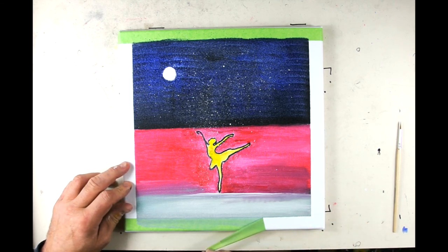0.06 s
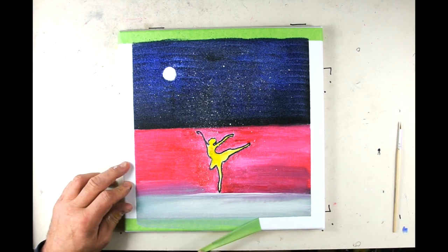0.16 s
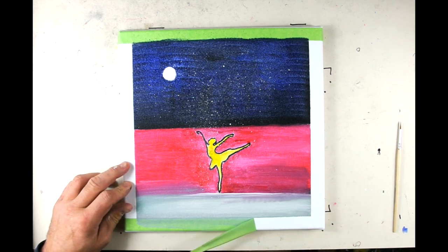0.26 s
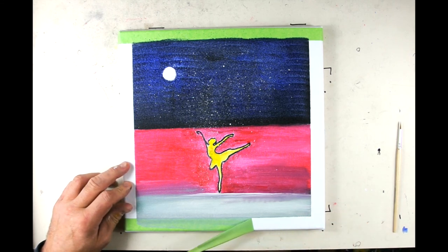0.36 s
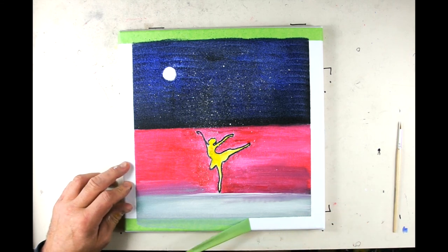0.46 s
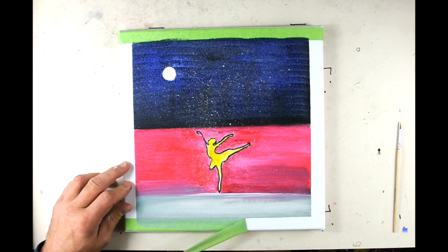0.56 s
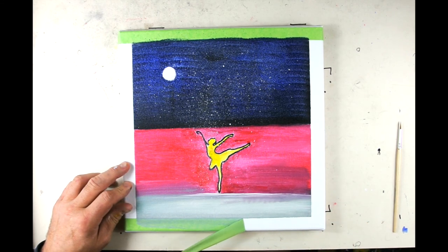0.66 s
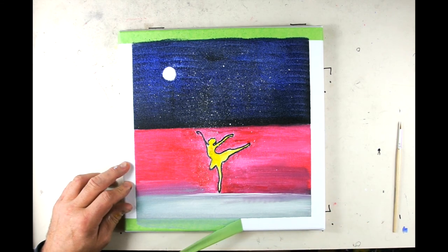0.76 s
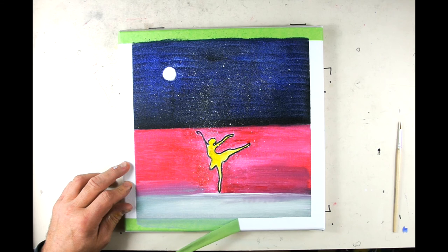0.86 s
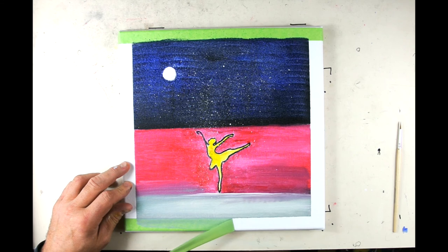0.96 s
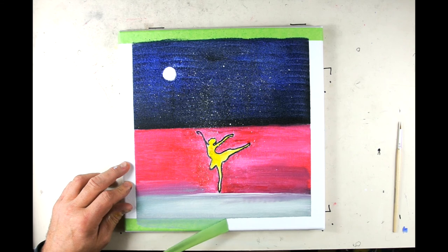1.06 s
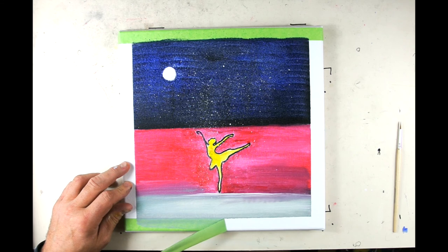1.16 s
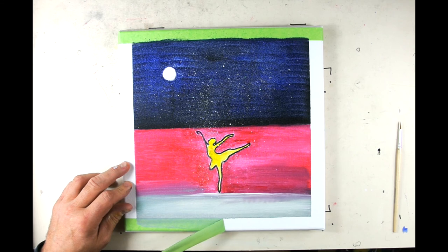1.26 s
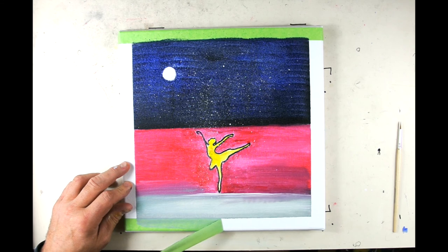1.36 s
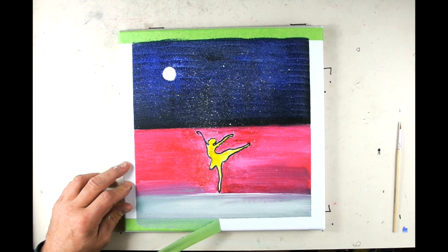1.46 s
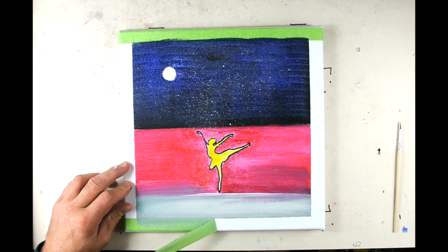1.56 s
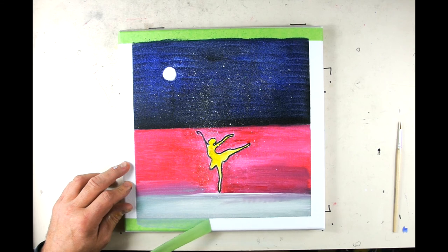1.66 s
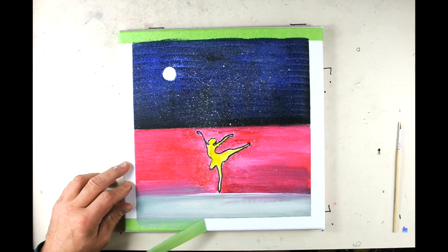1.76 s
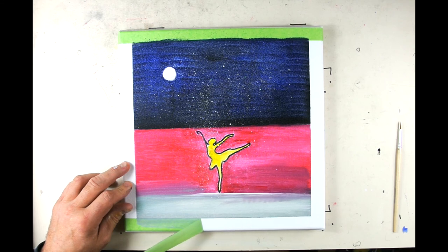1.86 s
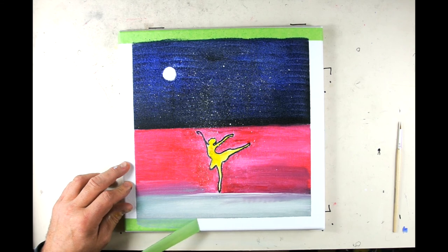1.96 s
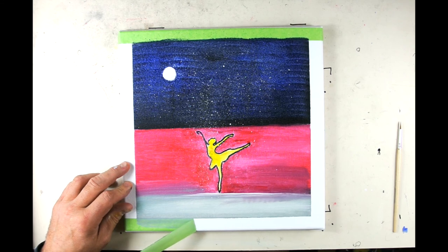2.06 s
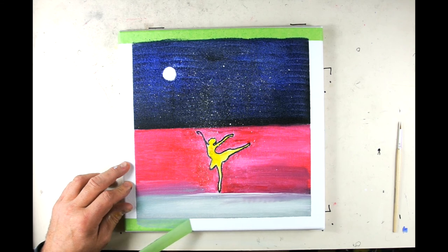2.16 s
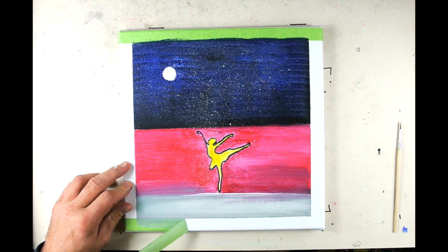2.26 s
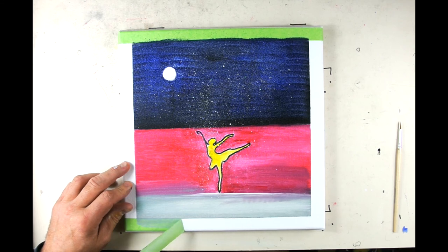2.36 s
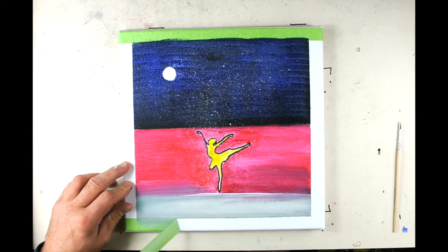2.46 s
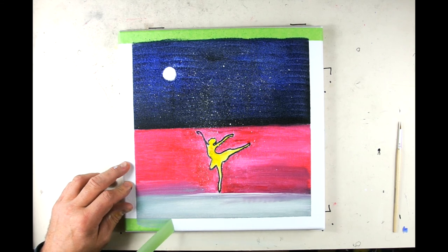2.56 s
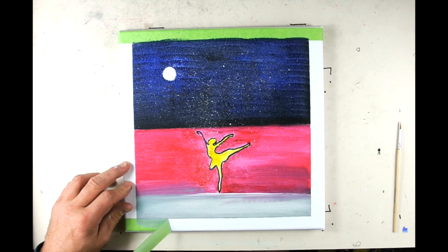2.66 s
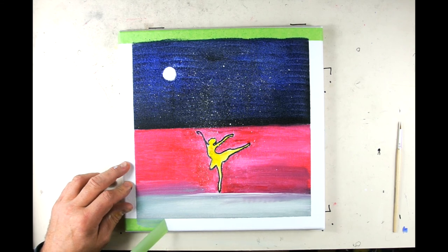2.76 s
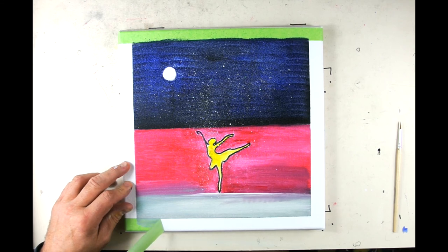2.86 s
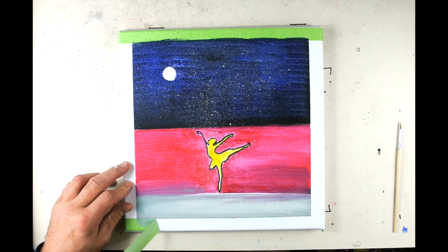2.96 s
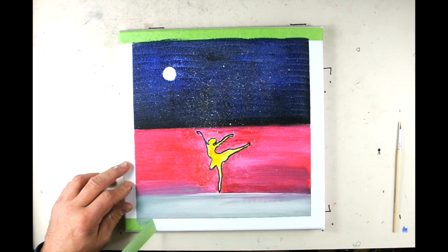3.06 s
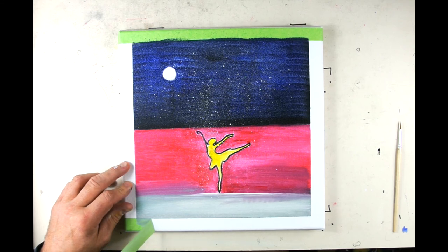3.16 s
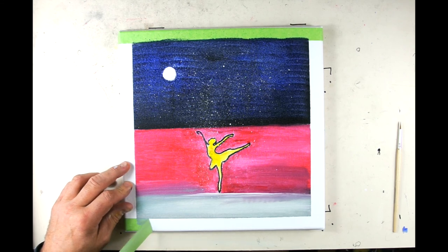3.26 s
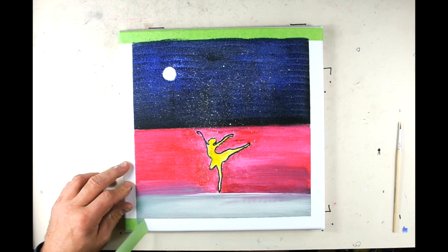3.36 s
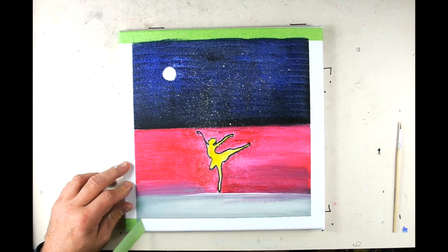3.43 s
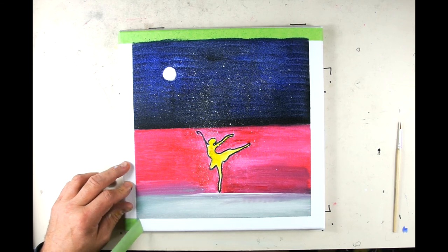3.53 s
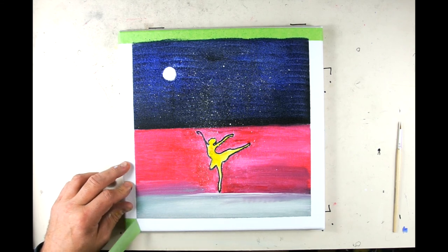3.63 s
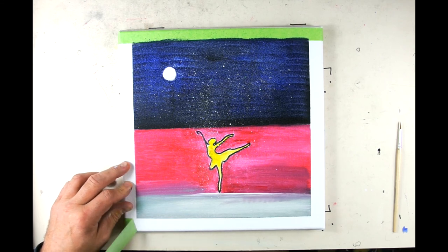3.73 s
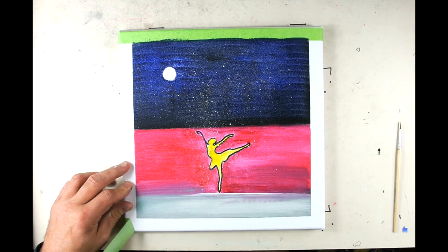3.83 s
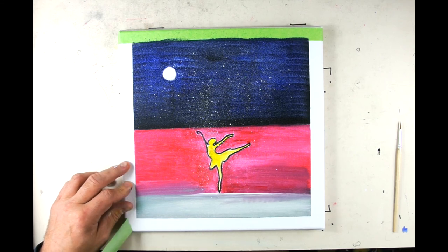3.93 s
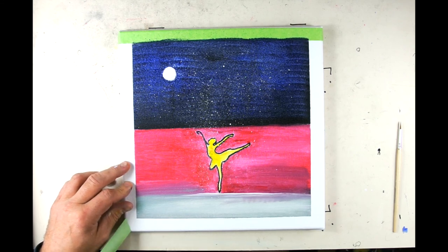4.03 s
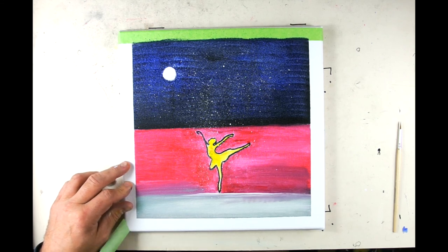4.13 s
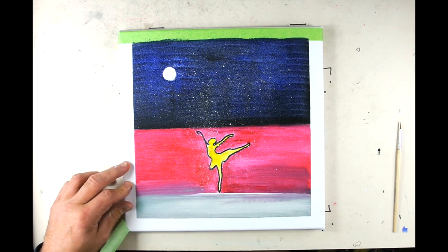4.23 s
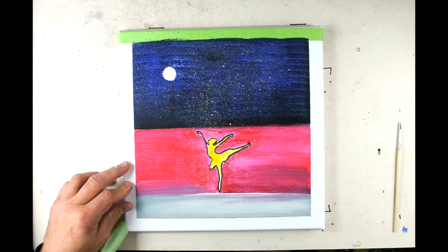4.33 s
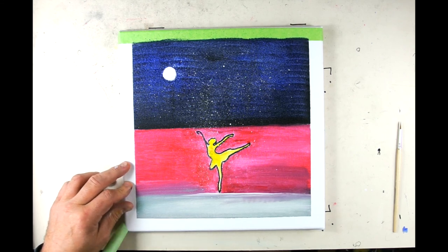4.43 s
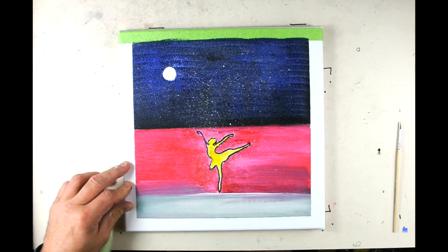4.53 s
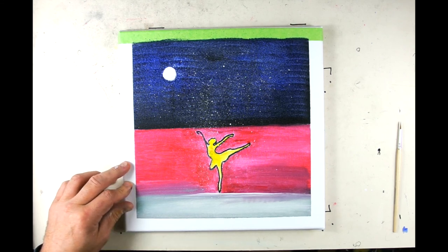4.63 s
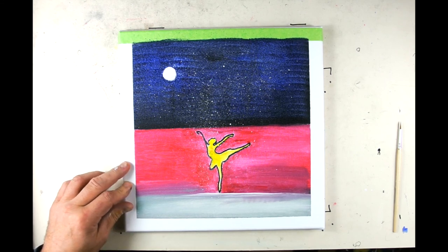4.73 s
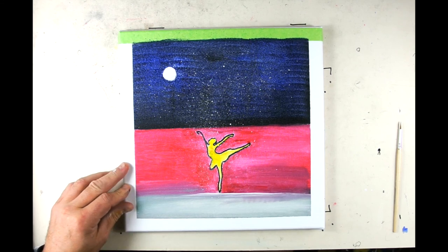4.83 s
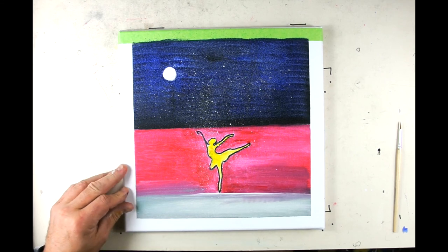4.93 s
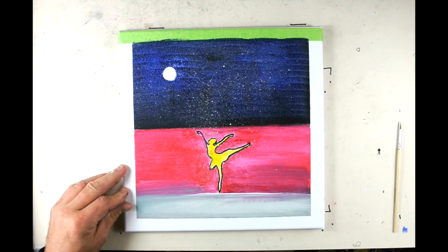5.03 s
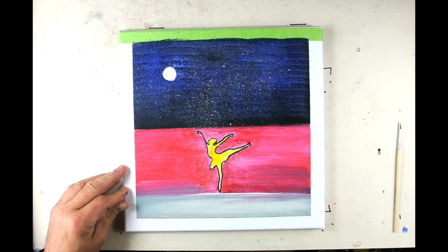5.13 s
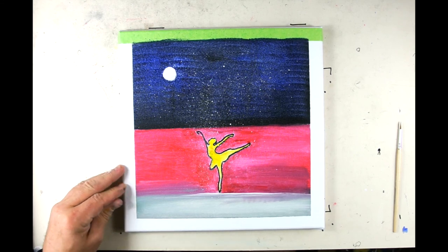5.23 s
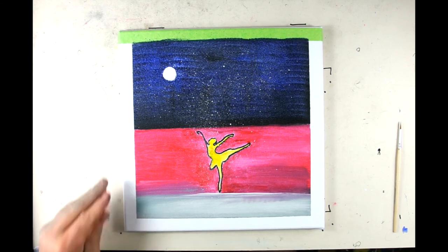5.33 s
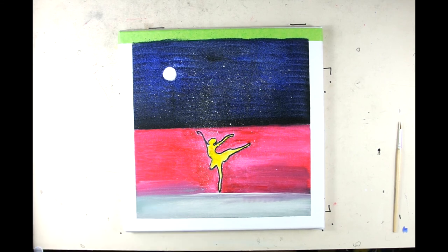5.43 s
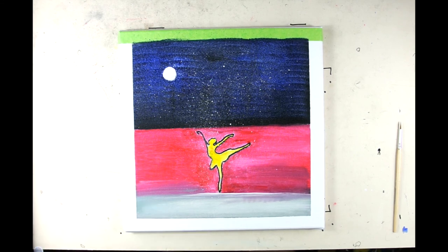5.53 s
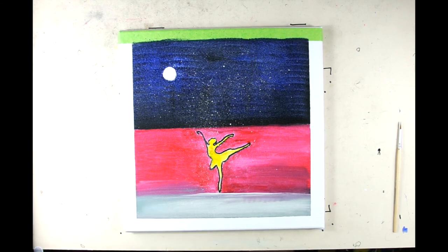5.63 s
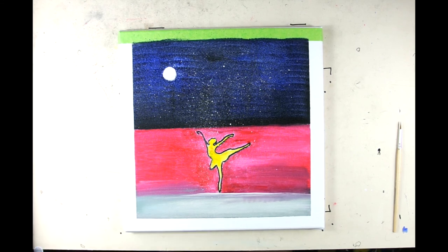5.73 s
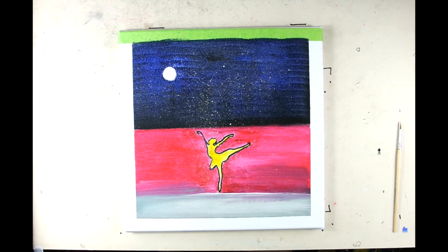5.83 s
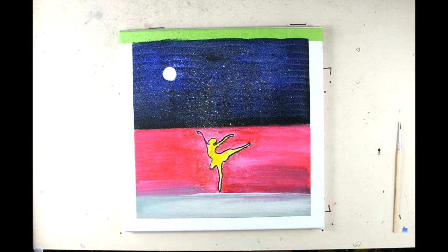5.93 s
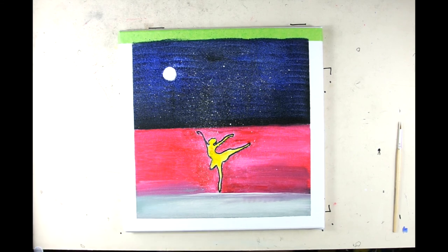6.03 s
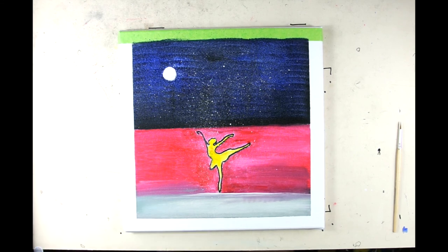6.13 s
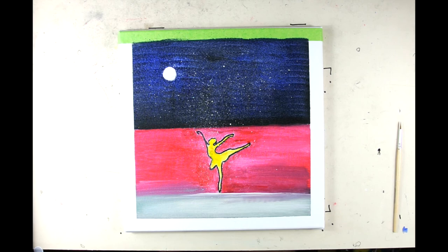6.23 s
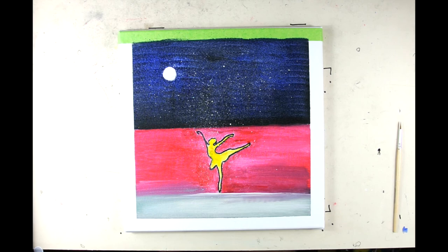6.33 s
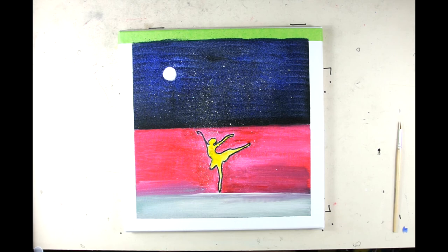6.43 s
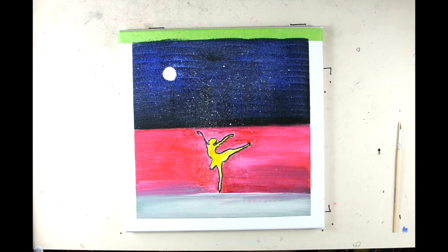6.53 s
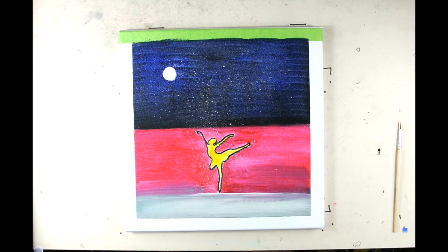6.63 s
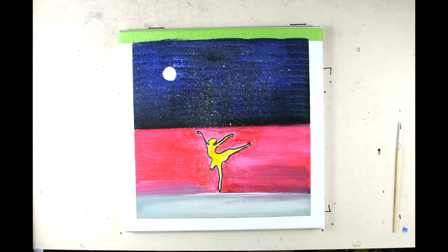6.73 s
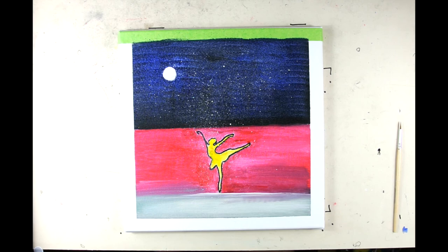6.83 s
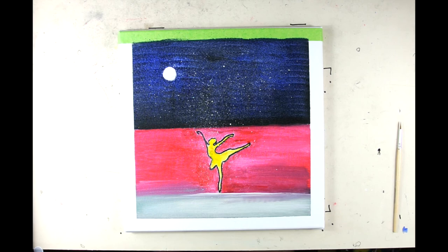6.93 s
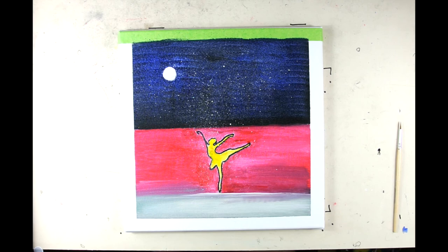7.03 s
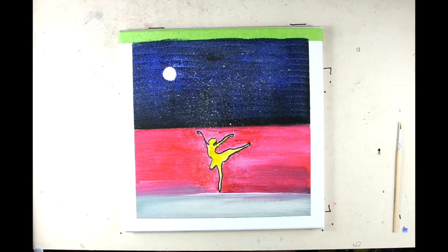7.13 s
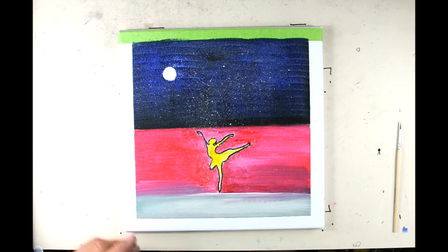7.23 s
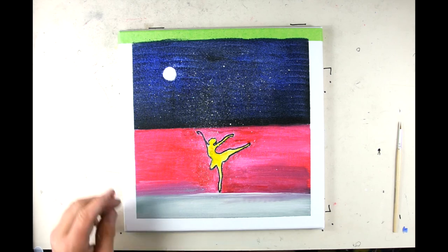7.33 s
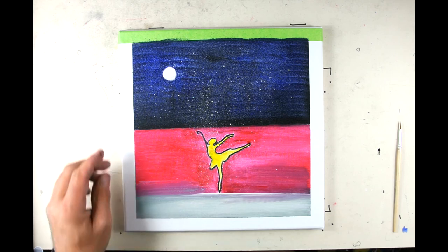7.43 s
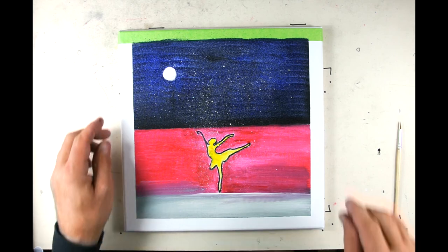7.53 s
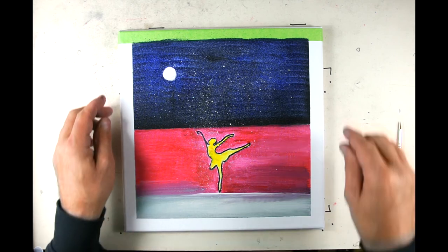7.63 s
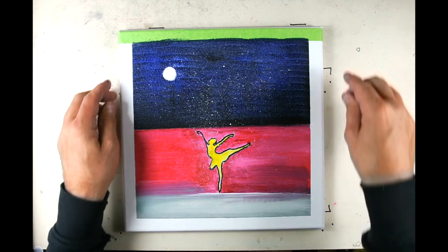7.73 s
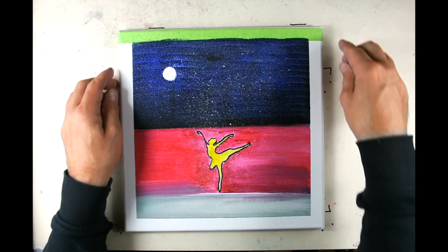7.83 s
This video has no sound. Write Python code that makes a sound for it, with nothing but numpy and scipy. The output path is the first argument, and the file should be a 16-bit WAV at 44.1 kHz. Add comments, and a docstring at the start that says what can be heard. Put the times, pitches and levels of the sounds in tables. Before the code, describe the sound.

In a quiet room, close to the microphone, masking tape is already being peeled from a stretched canvas. Fine, fizzy glue crackle and sharp papery pops start at once, with a cluster of cracks before 0.25 seconds, then a weaker, slower pull. Stronger rasping tugs swell around 1.0 and 1.6 seconds, and more follow unevenly through 2.5 and 3.7, each shaking the taut cloth and frame into short, hollow, woody resonance. From about 3.9 the canvas body fades, leaving thinner, drier paper crackle. At 4.48 to 4.5 the end rips free in a very quick, loud, whip-like snap with a short room tail. Afterwards the loose strip flutters softly, with muffled low bumps on the table until about 5.5. Crisp ticks and bright rustles come near 5.5, 5.8, 6.27, 6.4 and 6.7, then die away into faint, steady hiss.

```python
"""Tape peeled off a stretched canvas

Masking tape is pulled off the edge of a canvas lying on a table, in a quiet room. Glue threads break in random
grains of noise that follow tugs of the hand; filters let the paper strip, the cloth and the frame sound with them.
Near the corner the canvas fades, and the last bit lets go with a snap of five quick jerks.
The loose strip then ticks and rustles in grains of band-shaped noise, among soft bumps of decaying low sines."""
import sys
import numpy as np
from scipy import signal
from scipy.fft import rfft, irfft, next_fast_len
from scipy.io import wavfile
from scipy.ndimage import uniform_filter1d

SR = 44100
rng = np.random.default_rng(int(sys.argv[2]) if len(sys.argv) > 2 else 0)


def log_audio(samples):
    """Write samples as a 16-bit WAV file to the path given in sys.argv[1]."""
    # one column per channel
    frames = np.atleast_2d(samples).T
    # limit to full scale, then quantise
    limited = np.clip(frames, -1, 1)
    pcm = np.round(limited * 32767).astype(np.int16)
    wavfile.write(sys.argv[1], SR, pcm)


N = 348081
TIME = np.arange(N) / SR
SIZE = 2 * (next_fast_len(N + SR) // 2)  # even transform length with a second to spare for tails
FREQS = np.maximum(np.fft.rfftfreq(SIZE, 1 / SR), 1)

# quick jerks in which the end of the tape tears free: (time [s], level [dB])
SNAP_JERKS = [(4.478, -15), (4.484, -21), (4.4874, -11), (4.4928, -20), (4.4953, -15.5)]
# spectrum of a sudden slip or crack in the paper: (frequency [Hz], relative level [dB])
SLIP_SPECTRUM = [(100, -18), (900, -4.5), (2200, -13), (3600, 4), (6000, -1), (10000, 4), (16000, 4)]
# left-right likeness of the paper strip: (frequency [Hz], likeness [0-1])
STRIP_LIKENESS = [(500, 0.53), (2000, 0.43), (4000, 0.22), (7500, 0.011), (11000, 0.037), (15000, 0.088)]


def from_db(db):
    """Decibels to gain."""
    return np.exp(np.asarray(db) * (np.log(10) / 20))


def rms_one(x):
    """Scale to an rms of 1."""
    return x / np.sqrt(np.mean(np.abs(x) ** 2) + 1e-20)


def in_time(rows):
    """Each column of a curve at every sample."""
    s, *columns = np.transpose(rows)
    return [np.interp(TIME, s, column) for column in columns]


def at_hz(points, hz=FREQS):
    """Read a table on a log-frequency axis."""
    f, value = np.transpose(points)
    return np.interp(np.log(hz), np.log(f), value)


def filtered(x, response):
    """Pass a signal through a frequency response."""
    spectrum = rfft(x.astype(np.float32), SIZE)
    return irfft(spectrum * response.astype(np.complex64))[..., :N]


def colour(points, size=16384):
    """Causal (minimum-phase) response of a spectrum, keeping the power of white noise."""
    hz = np.maximum(np.fft.rfftfreq(size, 1 / SR), 1)
    cepstrum = irfft(np.log(from_db(at_hz(points, hz))))
    # folding the cepstrum forward puts all the energy after the onset
    cepstrum[1:size // 2] *= 2
    cepstrum[size // 2 + 1:] = 0
    impulse = irfft(rms_one(np.exp(rfft(cepstrum))))
    return rfft(impulse.astype(np.float32), SIZE)


def spread(pair, likeness):
    """Mix two unrelated signals, as mid and side, into ears of a given likeness per frequency."""
    alike = np.clip(at_hz(likeness), -.99, .99)
    mid, side = filtered(pair, np.sqrt([(1 + alike) / 2, (1 - alike) / 2]))
    return np.array([mid + side, mid - side])


def drift(rate_hz):
    """Smooth chance with an rms of 1, drawn at every 20th sample."""
    step, run_in = 20, SR // 20
    r = np.exp(-2 * np.pi * rate_hz * step / SR)
    chance = rng.standard_normal(N // step + 2 + run_in)
    slow = signal.lfilter([1], [1, -2 * r, r * r], chance)[run_in:]
    return np.interp(TIME, np.arange(len(slow)) * step / SR, rms_one(slow))


def blows(times, level_db, length_s):
    """Energy of single blows, each worth its level held for length_s."""
    energy = np.zeros(N)
    energy[np.round(times * SR).astype(int)] = from_db(level_db) ** 2 * length_s * SR
    return energy


def breaks(per_s, size_db, clump_db, clump_rate_hz):
    """Tiny contacts break at random, in clumps as they stick and slip; energy per sample, 1 on average."""
    scatter_db = size_db * np.minimum(rng.exponential(1, N), 4)
    sizes = from_db(scatter_db + clump_db * drift(clump_rate_hz))
    energy = (rng.random(N) < per_s / SR) * sizes ** 2
    return energy / (uniform_filter1d(energy, size=2600) + 1e-9)


def crackle(energy, ring_s, spike_share):
    """Each break is a sharp central spike, then a short dying flurry of waves in the sheet; a mid-side pair."""
    r, share = np.exp(-1 / (ring_s * SR)), np.clip(spike_share, 0, 1)
    lingering = signal.lfilter([1 - r], [1, -r], energy + 1e-18)
    pair = np.sqrt((1 - share) * lingering) * rng.standard_normal((2, N))
    pair[0] += np.sqrt(2 * share * energy) * rng.choice([-1, 1], N)
    return pair


def peel():
    """The same breaking threads and slips shake the canvas, the paper strip and the glue line."""
    # balance along the edge, relative to the paper: (time [s], canvas [dB], glue fizz [dB])
    balance = [(0, -1.1, 7), (.95, -.3, 5.2), (1.15, -1, -.3), (1.45, -4, 1), (1.65, -1.4, 1.7),
               (2.35, -1, 1.2), (2.6, 3.2, .8), (3.1, .5, .7), (3.68, -1, -1.7), (3.95, -12.5, -2.2),
               (4.15, -14, 4), (4.46, -14, 3.5)]
    # spectrum of the creaking paper: (frequency [Hz], relative level [dB])
    paper_spectrum = [(300, -48), (1200, -10), (2000, -6), (2800, -1.5), (3700, 3), (4600, 1.5),
                      (6000, 0.5), (8000, -2), (16000, -47)]
    # spectrum of the glue fizz: (frequency [Hz], relative level [dB])
    fizz_spectrum = [(1000, -27), (4000, -17), (6500, -3), (8000, 1), (10000, 2.5), (12500, 0.5),
                     (16000, -4)]
    paper_db = pull_db()
    canvas_db, fizz_db = paper_db + np.array(in_time(balance))
    slip_s, slip_paper_db, slip_canvas_db = all_slips(paper_db, canvas_db)

    # the threads fade out over the last 10 ms before the final jerk
    attached = np.clip((SNAP_JERKS[-1][0] - TIME) / .01, 0, 1)
    grip = attached * holding(slip_s, hold_s=.009, dip_db=-3)
    threads = grip * breaks(per_s=1900, size_db=3.6, clump_db=1.4, clump_rate_hz=150)

    force = from_db(canvas_db - 4) * crackle(threads, ring_s=.00024, spike_share=.57)
    force += crackle(blows(slip_s, slip_canvas_db, length_s=.0065), ring_s=.0012, spike_share=.6)
    creaks = from_db(paper_db - 2.5) * crackle(threads, ring_s=.0009, spike_share=.4)
    fizz = from_db(fizz_db - .84) * crackle(threads, ring_s=.0011, spike_share=.16)
    slips = crackle(blows(slip_s, slip_paper_db, length_s=.0058), ring_s=.0015, spike_share=.33)
    slips = creased(filtered(slips, colour(SLIP_SPECTRUM)), slip_s, ripple_db=3)

    strip = from_db(-.63) * filtered(creaks, colour(paper_spectrum))
    strip = strip + filtered(fizz, colour(fizz_spectrum)) + slips
    # only .45 of the canvas's swing in level reaches the frame
    shake = creaks[0] * from_db(.45 * (canvas_db - paper_db))
    body = canvas(force, thud_db=-5, ring_db=-4.5) + from_db(-2) * frame(shake, wander_db=3.5)
    return body + over_table(spread(strip, STRIP_LIKENESS), echo_db=-7)


def pull_db():
    """The hand pulls in tugs that swell and die away, overlapping on top of a slow creep."""
    # (peak time [s], peak level [dB], time to swell by 10 dB [s], time to fade by 10 dB [s])
    tugs = [(0.035, -41.4, 0.016, 0.118), (0.137, -33.8, 0.052, 0.024), (0.207, -33.5, 0.045, 0.073),
            (0.511, -37.7, 0.13, 0.191), (0.716, -44.0, 0.028, 0.093), (0.991, -24.7, 0.084, 0.074),
            (1.298, -42.1, 0.1, 0.432), (1.6, -26.3, 0.094, 0.036), (1.697, -30.5, 0.249, 0.228),
            (1.931, -37.5, 0.082, 0.462), (2.142, -35.6, 0.052, 0.181), (2.267, -32.9, 0.068, 0.114),
            (2.542, -28.2, 0.222, 0.085), (2.801, -31.7, 0.124, 0.144), (2.993, -34.1, 0.244, 0.109),
            (3.295, -31.4, 0.067, 0.092), (3.421, -31.2, 0.111, 0.05), (3.699, -32.2, 0.137, 0.126),
            (3.964, -33.2, 0.3, 0.044), (4.084, -36.2, 0.03, 0.07), (4.4, -39.5, 0.067, 0.163)]
    creep_db = -52
    power = np.full(N, from_db(creep_db) ** 2)
    for s, db, swell_s, fade_s in tugs:
        away = np.maximum((s - TIME) / swell_s, (TIME - s) / fade_s)
        near = away < 4  # ignore a tug once it is 40 dB down
        power[near] += from_db(db - 10 * away[near]) ** 2
    return 10 * np.log10(power)


def all_slips(paper_db, canvas_db):
    """Large patches of glue give way, and small ones at uneven gaps follow the pull: times, paper dB, canvas dB."""
    # large slips: (time [s], paper level [dB], canvas level [dB])
    large = [(0.0369, -22, -33), (0.089, -31, -36), (0.1308, -19.5, -37), (0.1374, -19.5, -32),
             (0.1458, -25, -39), (0.1793, -25, -34), (0.1849, -27, -45), (0.2252, -27, -38),
             (0.4416, -29, -41), (0.4871, -27, -33), (0.8632, -24, -35), (1.532, -22, -30),
             (1.5971, -16, -24), (1.6624, -26, -26), (1.7019, -22, -31), (1.7571, -25, -27),
             (1.9614, -25, -33), (2.0092, -24, -32), (2.0357, -26, -29), (2.4517, -22, -39),
             (2.5426, -29, -25), (2.5925, -29, -30), (2.804, -26, -31), (2.86, -30, -30),
             (2.9164, -28, -35), (2.9705, -30, -31), (3.3449, -26, -33), (3.9129, -27, -42),
             (4.0361, -34, -53), (4.078, -27, -44), (4.1803, -32, -60)]
    median_gap_s, scatter_db = 1 / 13, 1.6
    above_paper_db, above_canvas_db = 1.8, .6
    chance = rng.standard_normal((200, 3))
    s = np.cumsum(np.exp(.6 * chance[:, 0]) * median_gap_s)
    on_paper = np.interp(s, TIME, paper_db) + above_paper_db + scatter_db * chance[:, 1]
    on_canvas = np.interp(s, TIME, canvas_db) + above_canvas_db + scatter_db * chance[:, 2]
    during_peel = (s > large[0][0]) & (s < SNAP_JERKS[0][0])
    small = np.column_stack([s, on_paper, on_canvas])[during_peel]
    return np.vstack([large, small]).T


def holding(times, hold_s, dip_db):
    """Share of the crackle's energy left as the tape sticks and quietens for a moment before each slip."""
    stuck = np.zeros(N)
    for s in times:
        at = slice(round((s - hold_s) * SR), round(s * SR))
        stuck[at] = np.minimum(3 * (TIME[at] - s + hold_s) / hold_s, 1)
    return from_db(dip_db * stuck) ** 2


def creased(x, times, ripple_db):
    """The strip is bent differently at every slip, so each one has a few peaks and hollows of its own."""
    out, size = x.copy(), 512
    knots_hz = np.geomspace(1500, 16000, 9)
    hz = np.fft.rfftfreq(size, 1 / SR)
    for s, knots in zip(times, rng.standard_normal((len(times), len(knots_hz)))):
        start = round(s * SR) - size // 8
        at = slice(start, start + size)
        ripple = rms_one(from_db(ripple_db * np.interp(hz, knots_hz, knots)))
        out[:, at] = irfft(rfft(out[:, at]) * ripple)
    return out


def canvas(force, thud_db, ring_db):
    """The stretched cloth answers at once with a broad thud and rings on in its modes."""
    # modes of canvas and frame: (frequency [Hz], width [Hz], relative level [dB])
    mode_table = [(103, 15, -5.5), (160, 16, -17.5), (195, 7.4, -4), (275, 15, -1), (334.4, 16, 0.5),
                  (401, 16, 0), (477, 60, -45), (674, 19, 6), (753.4, 48, 5.5), (857.5, 101, 9.5),
                  (952, 11, -1), (1118, 20, 8), (1188, 42, 7.5), (1232, 30, 7.5), (1309, 94, 3.5),
                  (1445, 37, 10), (1624, 72, 7.5), (1685, 40, 6.5), (1888, 62, 10), (2354, 48, 8)]
    # spectrum of the thud: (frequency [Hz], relative level [dB])
    thud_spectrum = [(25, -13), (60, -23.5), (130, -0.5), (350, 0.5), (800, 3), (1700, 13), (2300, 3),
                     (3200, 4), (8000, -72.5)]
    # left-right likeness: (frequency [Hz], likeness [0-1])
    cloth_likeness = [(60, 0.56), (300, 1), (700, 0.91), (1700, 0.67), (3000, 0.27)]
    modes = []
    for k, (hz, width_hz, db) in enumerate(mode_table):
        resonance = 1 / (1 + 1j * (FREQS ** 2 - hz ** 2) / (FREQS * width_hz))
        modes.append((-1) ** k * from_db(db) * resonance)
    modes = np.array(modes, dtype=np.complex64)

    # as the peel line travels along the edge it favours one set of modes, then another
    place = 2 * np.pi * TIME / 3 + drift(3)
    ring = 0
    for nearness in (np.cos(place), np.sin(place)):
        chance = rng.standard_normal(len(modes)) + 1j * rng.standard_normal(len(modes))
        coupling = (1 + .35 * chance).astype(np.complex64)
        ring = ring + filtered(force * np.abs(nearness), rms_one(coupling @ modes))
    # waves cross the cloth before the modes build up
    ring = np.roll(ring, round(.0015 * SR), axis=1)
    thud = filtered(force, colour(thud_spectrum))
    return spread(from_db(thud_db) * thud + from_db(ring_db) * ring, cloth_likeness)


def frame(drive, wander_db):
    """The frame's resonances wax and wane as the peel line travels; near the corner the highest take over."""
    # (frequency [Hz], width [Hz], level along the edge [dB], level near the corner [dB]), relative to the paper
    notes = [(850, 140, -18, -14.5), (1170, 80, -20, -30), (1390, 70, -18, -27), (1600, 90, -13, -22),
             (2420, 110, -20, -17), (2790, 120, -26, -13), (3050, 140, -19, -12), (3680, 130, -18, -12.5)]
    corner_s, blend_s = 3.2, .1
    cornered = .5 + .5 * np.tanh((TIME - corner_s) / blend_s)
    out = np.zeros(N)
    for hz, width_hz, edge_db, corner_db in notes:
        coupling = from_db(edge_db + (corner_db - edge_db) * cornered + wander_db * drift(3))
        r = np.exp(-np.pi * width_hz / SR)
        poles = [1, -2 * r * np.cos(2 * np.pi * hz / SR), r * r]
        out += np.sqrt((1 - r * r) / 2) * signal.lfilter([1, 0, -1], poles, drive * coupling + 1e-18)
    return out


def over_table(x, echo_db):
    """The table throws the strip's sound back, combing it differently in each ear and as time goes on."""
    # (time [s], left delay [ms], right delay [ms])
    bounce = [(0, 1.48, 1.56), (1.2, 1.18, 1.78), (3.2, 1.67, 2.1), (4.5, 2.4, 1.9)]
    echo = [np.interp(TIME - ms / 1000, TIME, ear) for ms, ear in zip(in_time(bounce), x)]
    return x + from_db(echo_db) * np.array(echo)


def snap():
    """The last glue rips off and the freed strip cracks like a small whip."""
    # spectrum of the jerks: (frequency [Hz], relative level [dB])
    snap_spectrum = [(60, -27), (150, -14), (300, -8.5), (600, -13), (950, -4), (1450, -1.5), (2000, -6),
                     (3400, 2), (4300, -1.5), (5200, 2.5), (7000, -0.5), (10000, 1), (13000, -1),
                     (16000, 2.5)]
    jerks = crackle(blows(*np.transpose(SNAP_JERKS), length_s=.0048), ring_s=.0028, spike_share=.03)
    return over_table(spread(filtered(jerks, colour(snap_spectrum)), STRIP_LIKENESS), echo_db=-13)


def crease():
    """Creases in the loose strip flip: dry ticks from the stiff paper, part hollow and part bright."""
    # (time [s], hollow tick level [dB], bright crack level [dB])
    flips = [(5.477, -60, -47), (5.492, -56, -41), (5.497, -55, -43), (5.516, -57, -38), (5.545, -52, -37),
             (6.267, -36, -45)]
    # spectrum of the hollow tick: (frequency [Hz], relative level [dB])
    hollow_spectrum = [(500, -24), (2400, -16), (3100, -1), (3700, 3), (4600, -9), (7000, -9), (12000, -16),
                       (16000, -22)]
    s, hollow_db, crack_db = np.transpose(flips)
    hollow = crackle(blows(s, hollow_db, length_s=.005), ring_s=.0012, spike_share=.055)
    crack = crackle(blows(s, crack_db, length_s=.005), ring_s=.001, spike_share=.3)
    ticks = filtered(hollow, colour(hollow_spectrum)) + filtered(crack, colour(SLIP_SPECTRUM))
    return spread(ticks, STRIP_LIKENESS)


def rustles():
    """The loose strip flutters and is handled: fine grains, each rustle one band that swells and dies away."""
    # (time [s], level [dB], rise [s], 60 dB decay [s], centre [Hz], width [octaves])
    flutters = [(4.5, -53.5, .02, .6, 1400, 1), (4.53, -49.5, .09, .55, 3460, 0.33),
                (4.803, -52.5, 0.0055, .8, 1440, 0.28), (4.82, -45.5, 0.011, 0.39, 4900, 1.6),
                (5.03, -47, .005, 0.21, 4500, 1.9), (5.48, -44, .02, 0.35, 8000, 2.5),
                (5.5, -55, .038, .2, 2190, .55), (5.541, -35, 0.004, .15, 10000, 2.6),
                (5.78, -42, 0.018, 0.65, 9000, 1.3), (5.88, -49, .07, 0.64, 12000, 1.1),
                (6.268, -44, 0.0018, 0.64, 6000, 1.3), (6.4, -36.8, 0.003, 0.78, 2280, 0.89),
                (6.4, -57.5, .01, 1, 746, .95), (6.686, -35.5, 0.0039, 0.63, 8400, 2)]
    contacts = breaks(per_s=9000, size_db=1.8, clump_db=.7, clump_rate_hz=120)
    grains = crackle(contacts, ring_s=.0015, spike_share=.12)
    out, t = np.zeros((2, N)), TIME[:SR]
    hz = np.maximum(np.fft.rfftfreq(SR, 1 / SR), 1)
    for s, db, rise, t60, centre_hz, octaves in flutters:
        at = slice(round(s * SR), round(s * SR) + SR)
        band = rms_one((1 + (np.log2(hz / centre_hz) / octaves) ** 2 / 2) ** -1.5)
        swell = np.minimum(t / rise, 1) * from_db(db - 60 * np.maximum(t - rise, 0) / t60)
        out[:, at] += swell * irfft(rfft(grains[:, at]) * band, SR)
    return spread(out, STRIP_LIKENESS)


def bumps(contact_s=.0066):
    """Soft contacts wake only the low notes of the table, a little differently each time."""
    # soft bumps against the table: (time [s], relative level [dB])
    contacts = [(4.535, -54.5), (4.6, -56), (4.93, -53), (5.132, -52), (5.345, -58), (5.523, -63),
                (5.96, -56), (6.38, -62), (6.69, -63)]
    # low notes of the table: (frequency [Hz], 60 dB decay [s], relative level [dB])
    table_notes = [(75, 0.13, -7), (118, .13, 0.5), (205, 0.12, -1.5), (306, 0.13, 1.5), (409, .12, -2.5)]
    out, t = np.zeros(N), TIME[:SR // 2]
    for s, db in contacts:
        start = round(s * SR)
        for hz, t60, note_db in table_notes:
            level_db = db + note_db + rng.normal(0, 2)
            swell = (1 - np.exp(-t / contact_s)) * from_db(level_db - 60 * t / t60)
            out[start:start + len(t)] += swell * np.sin(2 * np.pi * (hz * t + rng.random()))
    return from_db(5.5) * out


def room(x, wet_db, build_s):
    """A diffuse tail of noise bands, different in each ear, each band dying at its own pace."""
    # (frequency [Hz], 60 dB decay [s])
    decay = [(150, 0.4), (600, 0.74), (1800, 0.93), (3600, 0.57), (9000, 0.85), (16000, 0.87)]
    # spectrum of the room: (frequency [Hz], relative level [dB])
    room_spectrum = [(60, -32), (280, 6), (600, 5.5), (1000, -2.5), (1500, -1), (2100, 4), (2900, 6),
                     (3500, 4.5), (4100, 4), (5300, 0), (9000, -2), (16000, -7)]
    t, tail = TIME[:SR], 0
    edges = np.geomspace(60, 17000, 9)
    for low, high in zip(edges, edges[1:]):
        bandpass = signal.butter(2, [low, high], "band", fs=SR, output="sos")
        band = signal.sosfilt(bandpass, rng.standard_normal((2, SR)))
        tail = tail + band * from_db(-60 * t / at_hz(decay, np.sqrt(low * high)))
    tail = rms_one(tail * (1 - np.exp(-t / build_s))) / np.sqrt(SR)
    return from_db(wet_db) * filtered(x, rfft(tail, SIZE) * colour(room_spectrum))


def hiss(level_db):
    """Steady air and microphone hiss: coloured noise, partly shared by the ears."""
    # spectrum: (frequency [Hz], relative level [dB])
    hiss_spectrum = [(12, -57), (20, -24), (42, -17), (98, -9), (176, -8.5), (317, -5.5), (355, -10),
                     (408, -5.5), (620, -7.5), (843, -6.5), (1600, -7), (2120, -7), (15800, -8.5)]
    # left-right likeness: (frequency [Hz], likeness [0-1])
    air_likeness = [(60, 0.16), (180, 0.37), (550, 0.24), (1650, 0.077), (4970, 0.088), (15000, 0.0)]
    noise = filtered(rng.standard_normal((2, N)), colour(hiss_spectrum))
    return from_db(level_db) * spread(noise, air_likeness)


def scene():
    """Tape and table close by, the room behind them; the rustles stay dry."""
    near = peel() + snap() + crease() + bumps()
    return near + room(near, wet_db=-11, build_s=.0033) + rustles() + hiss(level_db=-45.42)


def record(dry):
    """The top is cut steeply."""
    cutoff_hz = 15930
    return filtered(dry, 1 / np.sqrt(1 + (FREQS / cutoff_hz) ** 240))


dry = scene()
out = record(dry)
log_audio(out)
```